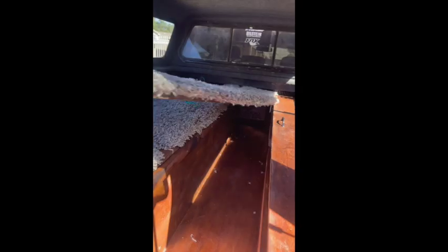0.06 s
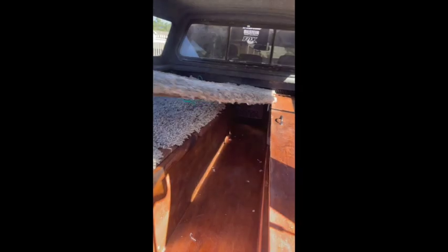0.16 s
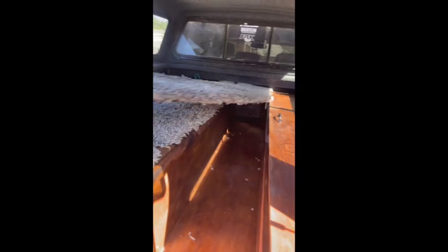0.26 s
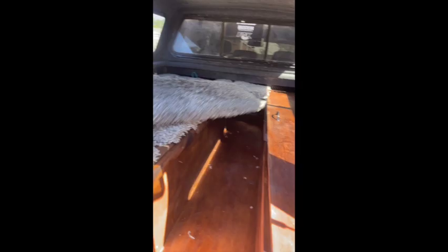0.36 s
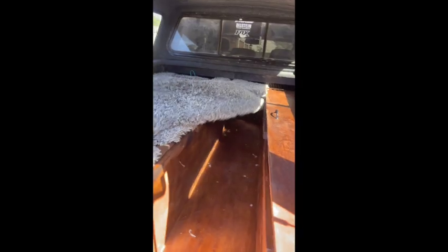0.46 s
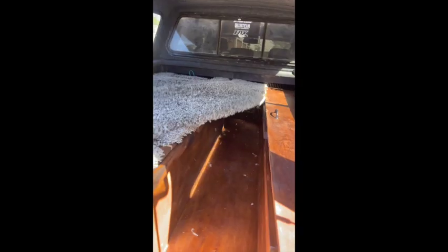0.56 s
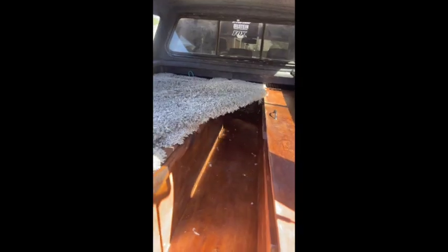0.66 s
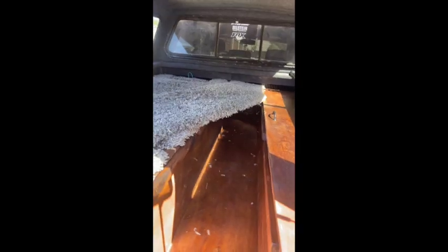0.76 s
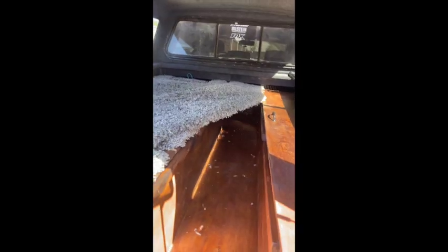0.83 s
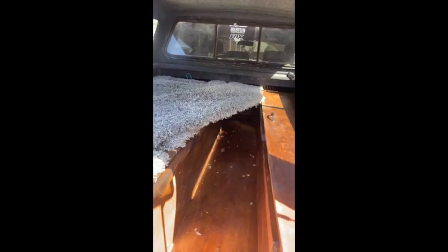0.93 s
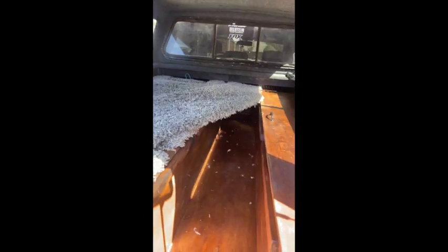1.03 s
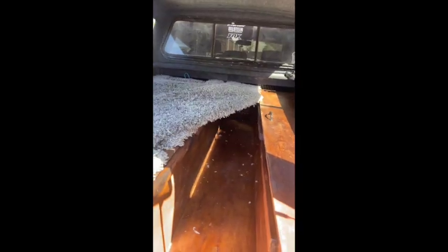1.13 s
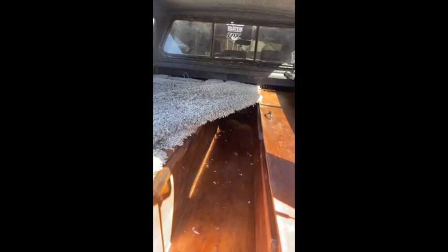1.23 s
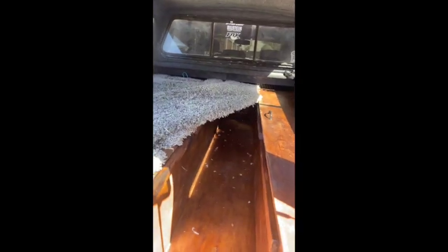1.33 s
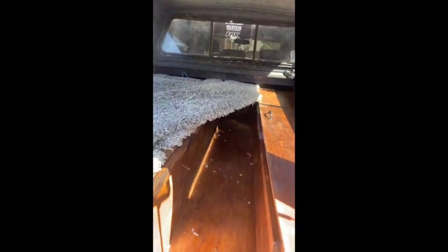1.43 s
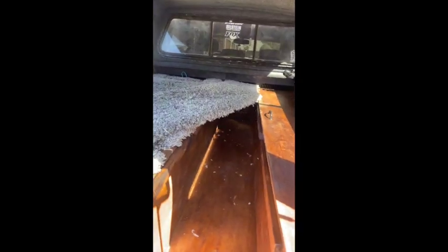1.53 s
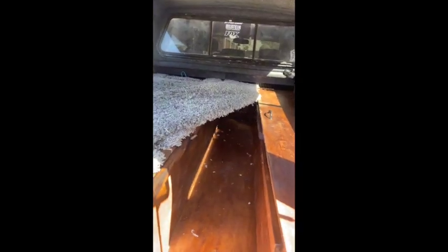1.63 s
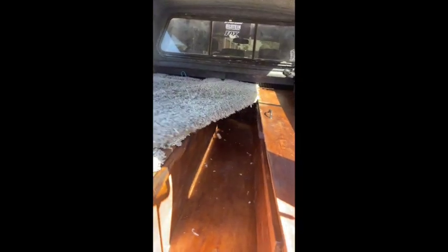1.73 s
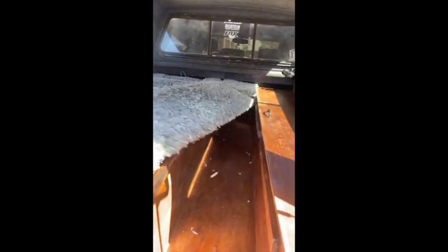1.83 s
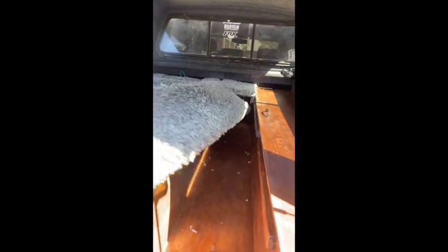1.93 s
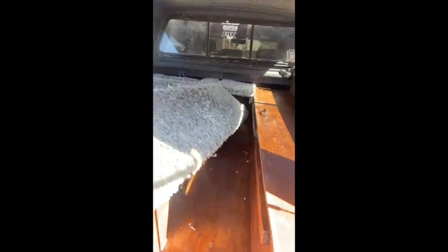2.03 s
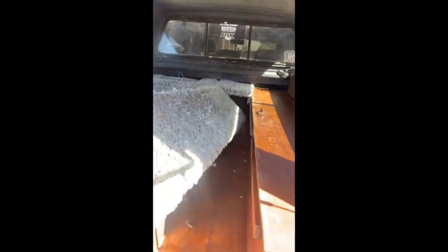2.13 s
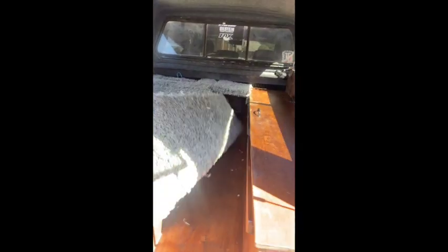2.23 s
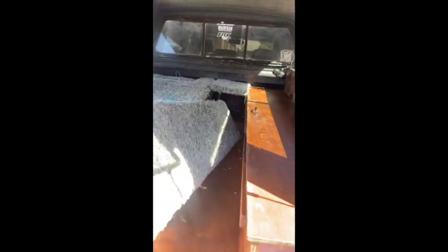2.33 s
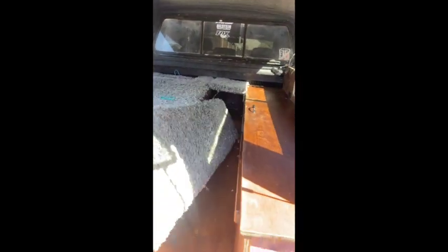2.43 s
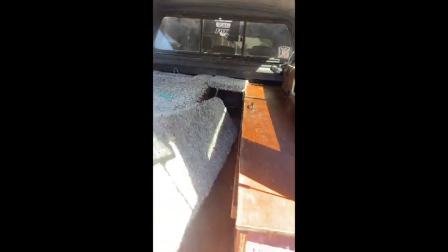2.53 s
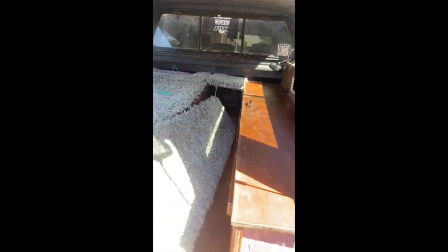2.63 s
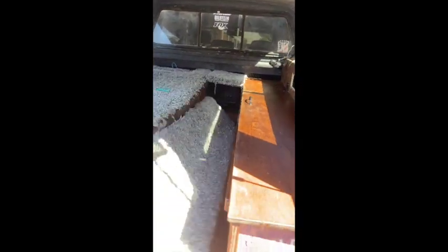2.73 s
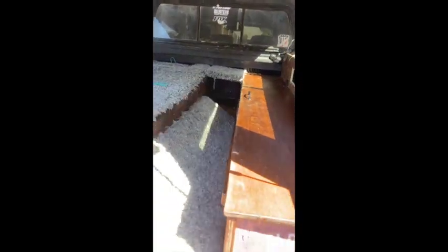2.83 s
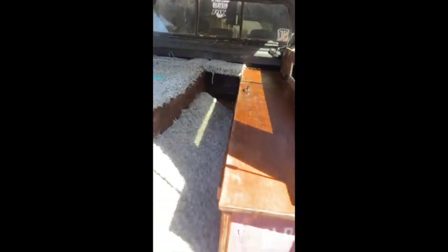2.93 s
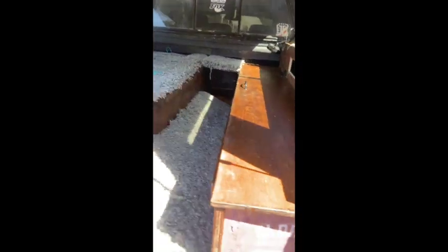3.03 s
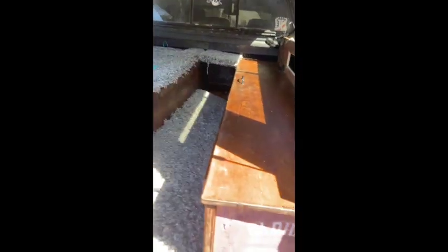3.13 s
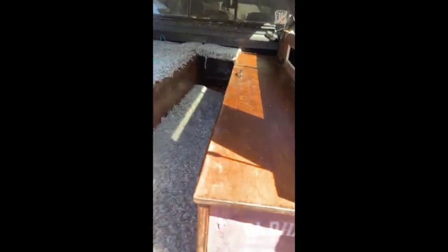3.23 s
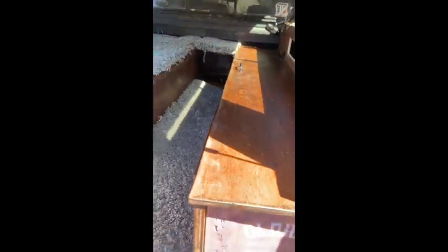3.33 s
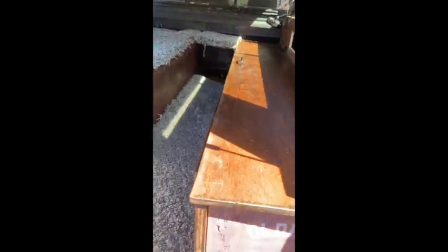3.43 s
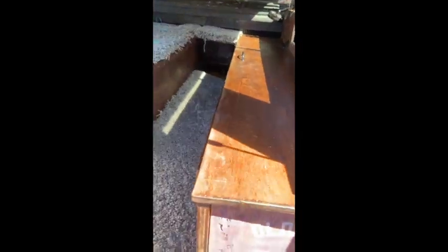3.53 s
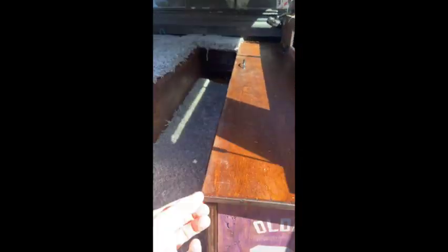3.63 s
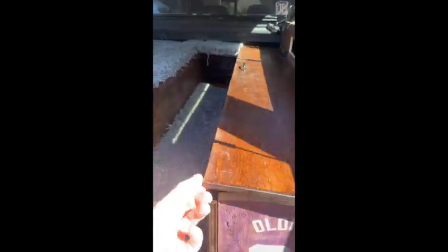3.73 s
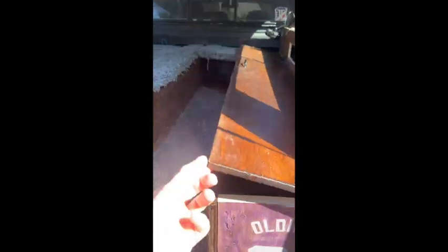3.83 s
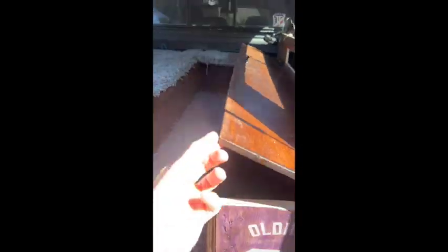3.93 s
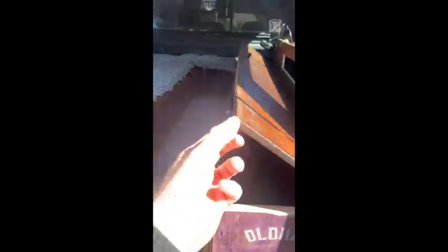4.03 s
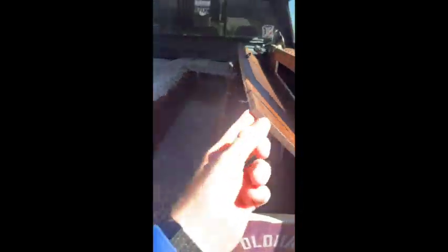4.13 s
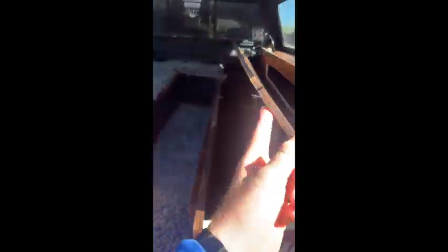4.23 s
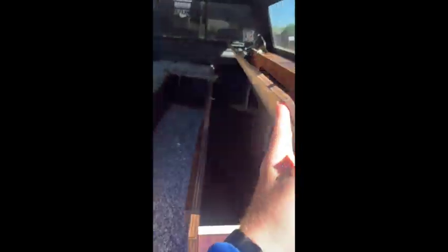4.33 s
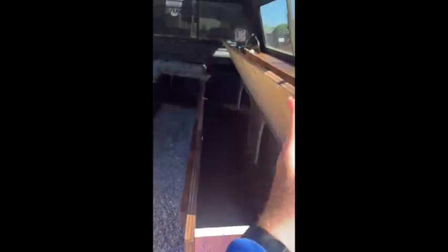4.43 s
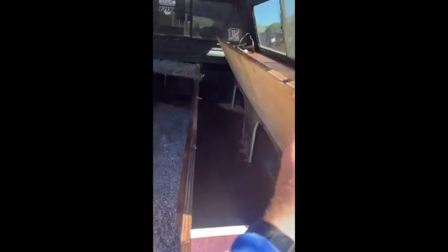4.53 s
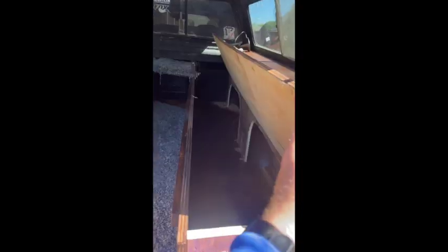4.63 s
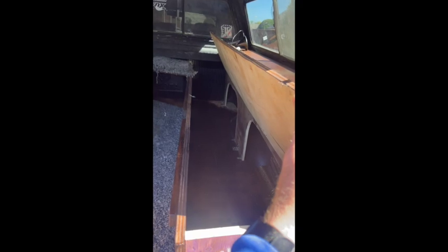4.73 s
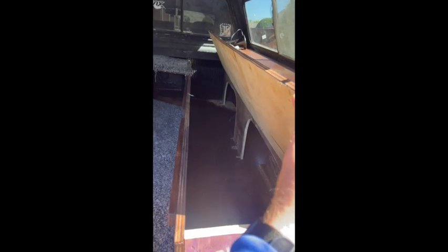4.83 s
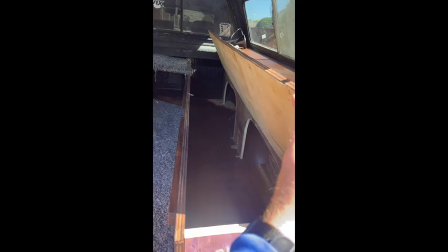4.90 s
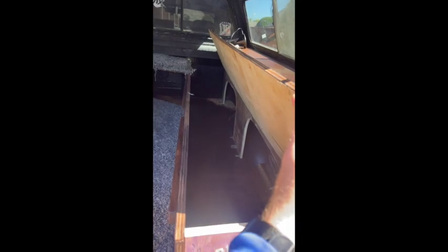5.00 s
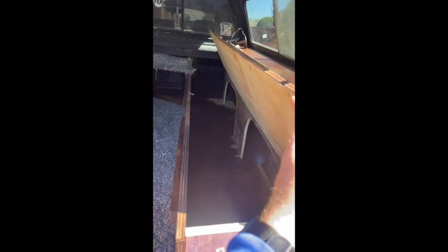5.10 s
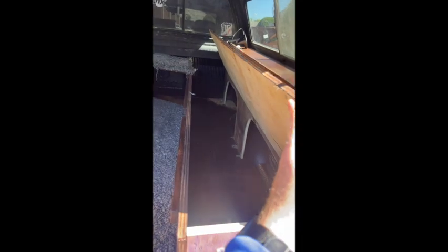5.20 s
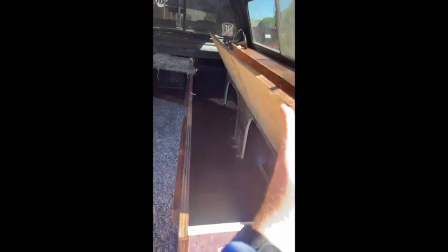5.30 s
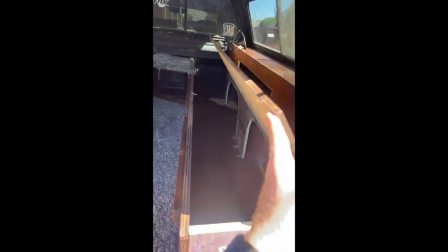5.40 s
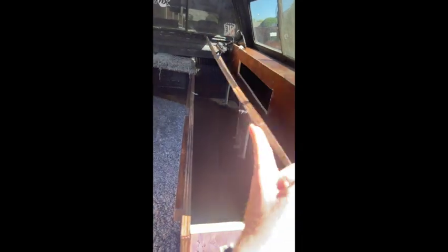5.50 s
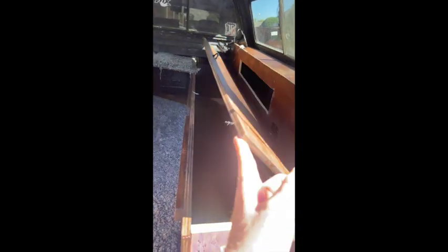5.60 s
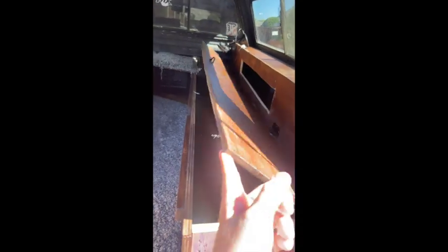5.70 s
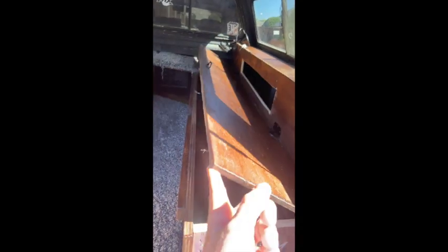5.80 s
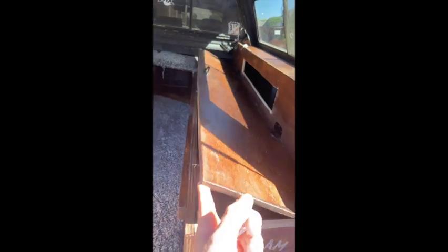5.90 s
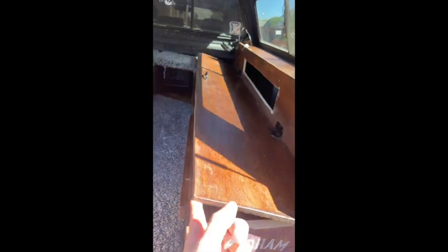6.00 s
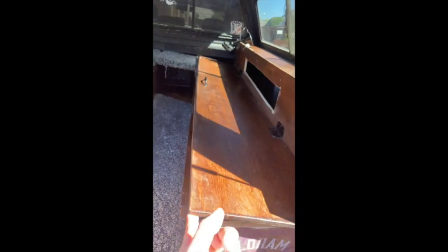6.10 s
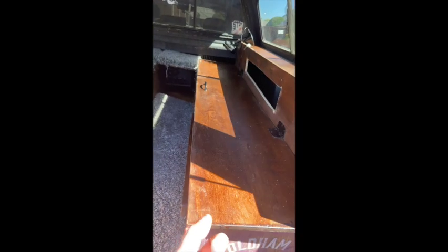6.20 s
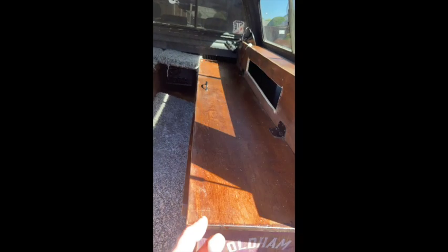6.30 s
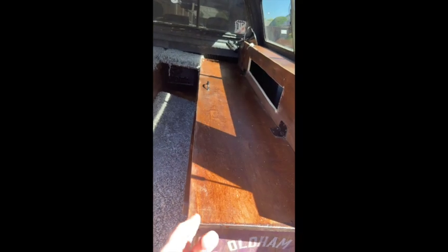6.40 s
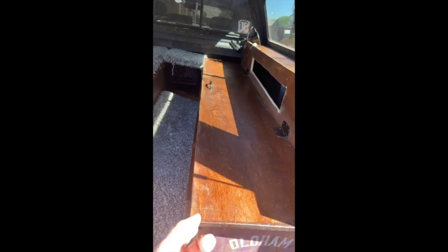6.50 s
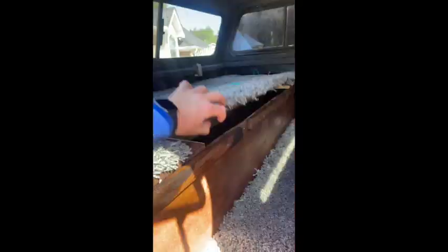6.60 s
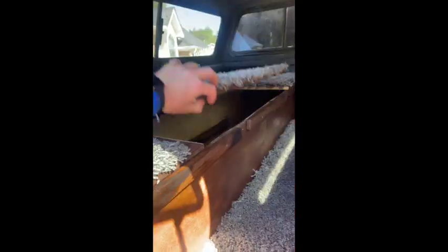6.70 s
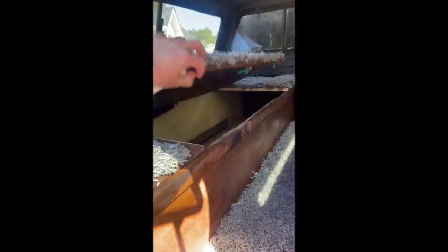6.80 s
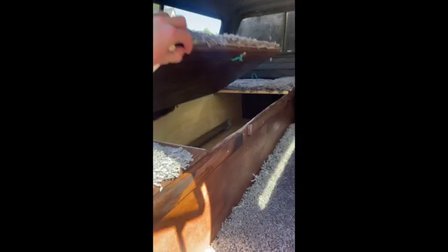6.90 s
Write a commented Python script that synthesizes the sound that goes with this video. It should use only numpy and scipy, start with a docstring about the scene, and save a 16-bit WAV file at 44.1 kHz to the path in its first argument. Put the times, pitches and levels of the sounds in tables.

```python
"""Inside a small truck camper, far traffic hums throughout and the body shudders softly on its springs under loads.
First come light knocks and scrapes, then a carpeted board is dragged out and dropped: blows boom in hollow boxes.
A wrist strap then crackles near the phone, and plywood lids scrape and are shut, down to a last hard blow.
Blows are ringing modes in a noise tail, scrapes are stick-slip grains through resonances, the rest is shaped noise.
The phone's two microphone ports hear the near treble out of step."""
import sys
import numpy as np
from scipy import signal
from scipy.fft import rfft, irfft, next_fast_len
from scipy.io import wavfile
from scipy.ndimage import uniform_filter1d, map_coordinates

SR = 44100
rng = np.random.default_rng(int(sys.argv[2]) if len(sys.argv) > 2 else 0)


def pcm_store(signal):
    """Save signal as 16-bit PCM."""
    levels = np.round(np.clip(np.atleast_2d(signal), -1, 1) * 32767)
    wavfile.write(sys.argv[1], SR, levels.astype(np.int16).T)


N = 306495  # length [samples]

# All dB columns are relative unless a comment says otherwise.
# far traffic spectrum: (frequency [Hz], level per Hz [dB])
TRAFFIC_SPECTRUM = [(25, -33), (96, 3.5), (169, -9.5), (243, -9.5), (269, -19.5), (584, -18.5),
                    (1200, -31.5), (1680, -35), (2550, -41), (12000, -59), (15600, -97.5)]
# left-right likeness of the far sound: (frequency [Hz], correlation [0-1])
TRAFFIC_LIKENESS = [(200, 1), (900, 0.1), (3500, 0.67)]
TRAFFIC_DB = -52.5  # rms about which the hum breathes

# the springs take a load: (time of deepest sag [s], level [dB])
LOADS = [(.5, -39.5), (2.421, -39), (3.001, -42), (3.44, -48), (4.3, -49.5), (4.65, -45.5), (5.57, -46),
         (6.298, -43.5), (6.8, -48.5)]
# body rocking on its springs: (frequency [Hz], level per Hz [dB])
SHUDDER_SPECTRUM = [(20, -7.5), (52, 8), (85, 4.5), (130, -4.5), (500, -120)]
SAG_DB_PER_S, SETTLE_DB_PER_S, REST_DB = 43.5, 46, -64  # rise, fall and floor of the shudder

# crackles of the wrist strap: (time [s], level [dB])
STRAP_TICKS = [(3.6365, -31), (3.6423, -16.5), (3.6484, -16), (3.6686, -18), (3.7605, -41), (3.7788, -34),
               (3.8925, -36), (3.93, -45.5), (3.9524, -40), (3.9802, -36.5), (4.0064, -34), (4.048, -37.5),
               (4.137, -30), (5.285, -45), (5.9783, -44), (6.0322, -40), (6.2103, -46), (6.2986, -37)]

# strokes of an edge over wood and carpet: (start [s], rise [s], hold [s], release t60 [s],
# groan level [dB], rasp level [dB], hiss level [dB])
STROKES = [(0, 0.0015, 0.15, 0.65, -47, -61.5, -64.5), (0.128, 0.039, 0.014, 2.9, -42, -62, -64.5),
           (0.299, 0.037, 0.019, 0.19, -38.5, -49.5, -59),
           (0.415, 0.039, 0.029, 0.093, -34.5, -41.5, -48.5), (0.483, 0.022, 0.072, 0.37, -43, -68, -76),
           (1.522, 0.38, 0.12, 1.6, -46, -47.5, -55.5), (2.38, 0.03, 0.052, 0.36, -41.5, -60, -56),
           (2.568, 0.031, 0.021, 0.077, -22, -33.5, -42), (2.648, 0.027, 0.15, .1, -39, -54, -65.5),
           (2.723, 0.037, 0.0084, 0.083, -42, -37, -50), (2.786, 0.051, 0.079, 0.092, -36.5, -46.5, -63),
           (2.865, 0.027, 0.017, 0.49, -23, -37, -49.5), (2.927, 0.086, .1, 0.094, -22, -34.5, -48.5),
           (3.111, 0.015, 0.062, 0.36, -34, -56, -53), (3.193, 0.053, 0.16, 0.18, -34.5, -52.5, -61.5),
           (3.616, 0.042, 0.019, 0.42, -40, -59.5, -54.5), (3.845, .15, 0.063, 0.82, -53.5, -71.5, -65),
           (4.195, 0.043, 0.14, 0.1, -34, -50, -52), (4.37, 0.06, 0.2, 0.17, -39.5, -55.5, -71),
           (4.536, 0.044, 0.0039, 0.23, -25.5, -44.5, -53.5), (4.623, 0.04, 0.2, 0.53, -59, -71, -90),
           (5.047, 0.004, 0.021, .2, -52, -57, -64.5), (5.092, .22, 0.091, 0.26, -37.5, -46, -54.5),
           (5.453, 0.062, 0.11, 0.63, -52, -69, -79.5), (6.135, 0.036, 0.041, 0.084, -38.5, -57, -63),
           (6.446, 0.0098, 0.04, 0.22, -36.5, -50, -63), (6.62, 0.018, 0.008, 0.39, -76.5, -66, -68),
           (6.836, 0.029, 0.012, 0.15, -46, -66, -66)]
PRESS = 1.27  # power of the rise: above 1 it starts slowly
# hollow boxes groaning: (frequency [Hz], width [Hz], level [dB])
GROAN = [(155, 27, 5), (235.4, 57, -1), (333, 37, 2), (570.7, 130, -12)]
# box under the sliding board: (frequency [Hz], width [Hz], level [dB])
CHATTER = [(148, 13, 2.5), (254.3, 26, -5), (368, 16, 3.5), (620, 50, -8), (846, 23, -16)]
# the board slides over that box: (from [s], to [s])
SLIDE_S = (2.86, 3.14)
# hiss of the carpet pile: (frequency [Hz], level per Hz [dB])
HISS_SPECTRUM = [(3000, -22.5), (4500, 1), (6000, -2.5), (8000, 1), (10500, 2.5), (12000, -16.5),
                 (14000, -37.5)]
# bare board edge: (frequency [Hz], width [Hz], level [dB])
EDGE = [(786, 130, 1.5), (1250, 110, -2), (1450, 230, -5), (2300, 740, -5.5), (2905, 320, -3.5),
        (3800, 1000, -12.5)]
# board on the carpet pile: (frequency [Hz], width [Hz], level [dB])
PILE = [(440.2, 400, -2.5), (1100, 790, -3), (1810, 700, -3), (3150, 790, -13)]
# board grinding along a rail: (frequency [Hz], width [Hz], level [dB])
RAIL = [(2446, 580, 0), (4520, 350, -10.5)]
# lid rising on its hinge: (frequency [Hz], width [Hz], level [dB])
LIFT = [(1305, 26, 5), (1524, 64, -8), (2550, 32, -9), (3346, 45, -6)]
# lid on its hinge: (frequency [Hz], width [Hz], level [dB])
HINGE = [(607, 174, 1), (1570, 175, 0.5), (2300, 110, 3.5), (3130, 490, -7.5), (3760, 220, -2.5)]
# what else rubs besides the bare edge: (from [s], to [s], resonances, share [0-1], grip swing [dB])
SURFACES = [(1.405, 2.231, PILE, 0.93, 1.5), (2.975, 3.139, RAIL, 0.5, 2.5),
            (4.262, 4.551, LIFT, 0.39, 1.5), (4.661, 5.751, HINGE, 0.95, -1)]
EDGE_GRIP_DB = 3  # grip swing of the bare edge

# blows of wood on wood: (time [s], contact time constant [ms], boom level [dB],
# hollow note of the box [Hz], its level [dB], knock level [dB],
# dry note of the board [Hz], its level [dB], crack level [dB])
BLOWS = [(0.0246, 0.44, -37, 143, -17.5, -35.5, 1250, -34.5, -60.5),
         (0.176, 1.4, -23, 215, -19, -41, 1420, -39, -42),
         (0.1938, 0.82, -36, 152, -31.5, -32.5, 984, -36, -80),
         (0.3227, 3.5, -42, 146, -24, -41.5, 1740, -38.5, -43.5),
         (0.411, 2.2, -23, 155, -10, -31.5, 1770, -39, -45),
         (0.458, 4.9, -48.5, 808, -36, -37.5, 2140, -37.5, -30),
         (2.2324, 1.6, -7.5, 366.7, -1.5, -4, 963, -3.5, -11),
         (2.236, 3.5, -13, 168, -2, -13, 1640, -14, -34),
         (2.326, 0.9, -5, 97.4, -9.5, -27.5, 1124, -27, -34.5),
         (2.4253, 0.83, -8, 140, -26, -45, 1570, -34.5, -47),
         (2.488, 3.3, -30.5, 470, -41.5, -40, 760, -48, -67),
         (2.578, 1.1, -41.5, 299.5, -12, -19, 1310, -27.5, -30),
         (2.6014, 11.7, -41.5, 357.3, -8.5, -9, 969, -14.5, -29),
         (2.722, 0.75, -16, 121, -7.5, -3.5, 1470, -7.5, -22),
         (2.8671, 1.3, -19.5, 163, -15.5, -19.5, 1570, -34, -38.5),
         (3.029, 8.4, -29.5, 148, -11, -36, 2300, -31, -51),
         (3.3528, 0.33, -12, 329.6, -12, -17.5, 1329, -15, -43.5),
         (4.2087, 2.85, -42, 256, -26.5, -21, 1300, -20.5, -25),
         (4.228, 2.8, -49, 331, -25.5, -25, 790, -34.5, -49.5),
         (4.34, 21.5, -26.5, 169, -15, -13, 1300, -26, -37),
         (4.562, 4, -33, 326.3, -18, -29.5, 1054, -28, -31),
         (4.6, 5.9, -36, 424.6, -24.5, -36, 800, -39, -61),
         (5.1338, 0.66, -54, 331, -57, -43, 1470, -54.5, -44.5),
         (5.3986, 0.97, -16.5, 619, -19.5, -13.5, 2230, -19, -23.5),
         (6.1442, 1.35, -41, 179, -21, -35.5, 943, -44, -64.5),
         (6.4901, 0.53, -18, 125.6, -3.5, -11.5, 2603, -15, -27.5)]
# plywood modes: (frequency [Hz], level [dB], t60 [s])
WOOD_MODES = [(52.7, -1.5, 0.81), (108.9, -1.5, 0.34), (165.3, -1.5, 0.26), (262.3, -3, 0.18),
              (355.8, 1, 0.11), (513.6, -9, 0.11), (615.4, -3, 0.12), (790, -7.5, 0.061),
              (1035.4, -13, 0.1), (1300, -9, 0.09), (1657, -6.5, 0.058)]
# reverberation of the cabin: (frequency [Hz], t60 [s])
CABIN_T60 = [(50, 0.72), (150, 0.48), (400, 0.22), (1200, 0.11), (4000, 0.087), (12000, 0.11)]
BOOM_HZ, KNOCK_HZ, CRACK_HZ = 75, 580, 4200

# lead of the left port for near sound: (frequency [Hz], phase [rad])
LEFT_LEAD = [(0, 0), (1380, -0.1), (3010, 1.1), (4130, 0.9), (4570, 1.9), (5250, 5.0), (5680, 6.1),
             (8350, 9.1), (9650, 9.6), (11500, 12.1), (13900, 12.9), (16000, 16.2)]
# port balance: (frequency [Hz], level up at the right and down at the left [dB])
RIGHT_LOUDER = [(40, -0.33), (300, 0.57), (2500, 0.03), (12000, 0.77)]
TOP_HZ = 16400  # band limit of the phone


def amp(db):
    """Gain of a level in dB."""
    return 10 ** (np.asarray(db) / 20)


def unit(x):
    """x at rms 1."""
    return x / np.sqrt(np.mean(x ** 2) + 1e-20)


def along(points, hz):
    """Values between (Hz, value) points, read on a log frequency axis."""
    f, v = np.transpose(sorted(points))
    return np.interp(np.log(hz + 1), np.log(f + 1), v)


def wobble(rate):
    """A smooth random curve through `rate` random knots a second."""
    knots = rng.standard_normal(int(N * rate / SR) + 4)
    return map_coordinates(knots, [np.arange(N) * rate / SR])


def filtered(x, response):
    """x times a complex response of frequency."""
    m = next_fast_len(x.shape[-1] + 8192)
    spectrum = rfft(x, m) * response(np.fft.rfftfreq(m, 1 / SR))
    return irfft(spectrum, m)[..., :x.shape[-1]]


def causal(x, spectrum):
    """x coloured by (Hz, dB) points at minimum phase, so nothing sounds before its start."""
    gain = amp(along(spectrum, np.fft.rfftfreq(4096, 1 / SR)))
    cepstrum = irfft(np.log(gain))
    cepstrum[1:2048] *= 2  # fold the backward half of the cepstrum onto the forward half
    cepstrum[2049:] = 0
    impulse = irfft(np.exp(rfft(cepstrum)))
    return signal.fftconvolve(x, impulse)[:len(x)]


def resonant(modes):
    """Response of (Hz, width, dB) resonances of wood, which passes little above the last one."""
    def response(f):
        total = 0
        for k, (centre, width, db) in enumerate(modes):
            peak = 1j * f * width / (centre ** 2 - f ** 2 + 1j * f * width)
            total = total + (-1) ** k * amp(db) * peak  # neighbours in opposite phase
        rolloff = 1 / (1 + 1j * f / (1.4 * modes[-1][0])) ** 2
        return rolloff * total
    return response


def traffic():
    """A far, slowly breathing hum: alike at both ports in the bass, less so higher up."""
    def mid_and_side(hz):
        turn = np.arccos(np.clip(along(TRAFFIC_LIKENESS, hz), -1, 1)) / 2
        return amp(along(TRAFFIC_SPECTRUM, hz)) * [np.cos(turn), np.sin(turn)]

    mid, side = filtered(rng.standard_normal((2, N)), mid_and_side)
    breathing = amp(TRAFFIC_DB + 0.68 * wobble(1.8))
    return breathing * unit(np.array([mid + side, mid - side]))


def rocking():
    """The body on its springs shudders under each load and settles: low noise swelling and fading."""
    s, db = np.transpose(LOADS)
    t = np.arange(N)[:, None] / SR - s
    load_db = db - np.maximum(-SAG_DB_PER_S * t, SETTLE_DB_PER_S * t)
    shudder = np.sqrt(np.sum(amp(load_db) ** 2, axis=1) + amp(REST_DB) ** 2)  # powers add
    rumble = unit(filtered(rng.standard_normal(N), lambda f: amp(along(SHUDDER_SPECTRUM, f))))
    return shudder * amp(6.0) * rumble


def strap():
    """Dry snaps of noise, gone in milliseconds, with a faint short echo off the walls."""
    out, t = np.zeros(N + SR), np.arange(SR // 20) / SR
    colour = [(500, -32.5), (3000, -31.5), (7000, -17.5), (10800, -7.0), (13000, -36.0), (17000, -27.5)]
    envelope = amp(-60 * t / .004) + amp(-17 - 60 * t / .04)  # snap + echo
    for s, db in STRAP_TICKS:
        snap = envelope * rng.standard_normal(len(t))
        out[round(s * SR):][:len(t)] += amp(db + 11.5) * causal(snap, colour)
    return out[:N]


def strokes():
    """Gains of groan, rasp and hiss: each stroke rises, holds and lets go; powers add."""
    start, rise, hold, t60, *levels_db = np.transpose(STROKES)
    t = np.arange(N)[:, None] / SR - start
    attack = np.clip(t / rise, 0, 1) ** PRESS
    release = amp(-60 * np.maximum(t - rise - hold, 0) / t60)
    power = (attack * release) ** 2 @ amp(levels_db).T ** 2
    return np.sqrt(power).T


def patchy(x, depth_db):
    """x with its colour shifting at random as the point of contact moves."""
    z = signal.stft(x, nperseg=256)[2]
    field = uniform_filter1d(rng.standard_normal(z.shape), size=4, axis=0)  # smooth over pitch
    field = uniform_filter1d(field, size=14, axis=1)  # and over time
    return signal.istft(z * amp(depth_db * unit(field)), nperseg=256)[1][:N]


def drag():
    """Stick and slip: uneven grains drive the hollow boxes, the board's edge or a lid, and the carpet pile."""
    groan, rasp, hiss = strokes()
    seconds = np.arange(N) / SR
    spans = [np.digitize(seconds, (start, end)) == 1 for start, end, *_ in SURFACES]
    grip_db = wobble(35) * np.select(spans, [db for *_, db in SURFACES], EDGE_GRIP_DB)

    def grains(rate, spread_db):
        return amp(spread_db * wobble(rate) + grip_db) * rng.standard_normal(N)

    def ring(grain, modes):
        return unit(filtered(grain, resonant(modes)))

    rub = patchy(grains(300, 1.8), depth_db=2.5)
    bare = ring(rub, EDGE)
    blends = [unit(share * ring(rub, modes) + (1 - share) * bare) for _, _, modes, share, _ in SURFACES]
    edge = np.select(spans, blends, bare)

    body = grains(65, 0.93)
    sliding = np.digitize(seconds, SLIDE_S) == 1
    boxes = np.where(sliding, ring(body, CHATTER), ring(body, GROAN))

    pile = unit(filtered(grains(460, 0.84), lambda f: amp(along(HISS_SPECTRUM, f))))
    return groan * boxes + rasp * edge + hiss * pile


def blows():
    """Each blow cracks, rings the plywood at new strengths and dies away in the cabin, bass lasting longest."""
    out, t = np.zeros(N + SR), np.arange(SR // 2) / SR
    hz, frames = np.fft.rfftfreq(512, 1 / SR), np.arange(175) * 128 / SR
    pink = np.sqrt(300 / (hz[:, None] + 250))  # flat at the bottom, pink higher up
    fading = pink * amp(-60 * frames / along(CABIN_T60, hz)[:, None])
    for (s, contact_ms, boom_db, hollow_hz, hollow_db, knock_db,
         dry_hz, dry_db, crack_db) in BLOWS:
        ring = np.zeros(len(t))
        for f, db, t60 in [*WOOD_MODES, (hollow_hz, 3, .15), (dry_hz, -4, .06)]:
            decay = amp(db + rng.normal(0, 0.52) - 60 * t / t60)
            buildup = 1 - np.exp(-t * f / 0.72)  # about a cycle, so the bass comes after the crack
            ring += decay * buildup * np.sin(2 * np.pi * f * t)

        z = signal.stft(rng.standard_normal(len(t)), nperseg=512, noverlap=384)[2]
        tail = signal.istft(z * fading[:, :z.shape[1]], nperseg=512, noverlap=384)[1][:len(t)]
        tail = tail * (1 - np.exp(-t / 0.0026))
        crack = amp(15.0 - 60 * t / 0.012) * rng.standard_normal(len(t))

        colour = [(20, boom_db - 21.5), (BOOM_HZ, boom_db), (hollow_hz, hollow_db),
                  (KNOCK_HZ, knock_db), (dry_hz, dry_db), (CRACK_HZ, crack_db),
                  (11000, crack_db - 9.5), (14000, crack_db - 61.5)]
        blow = causal(crack + amp(-2.5) * ring + amp(15) * tail, colour)
        contact = 1 - np.exp(-1000 * t / contact_ms)  # a longer contact softens the onset
        out[round(s * SR):][:len(t)] += amp(-2.0) * contact * blow
    return out[:N]


def ports(x):
    """Near sound reaches the two ports with a phase gap, wide in the treble, and a slight level difference."""
    def left_and_right(hz):
        gap = np.interp(hz, *np.transpose(LEFT_LEAD))
        balance_db = np.outer([-1, 1], along(RIGHT_LOUDER, hz))
        return np.exp(.5j * gap * [[1], [-1]]) * amp(balance_db)

    pair = filtered(x, left_and_right)
    # reflections in the cabin shift the balance from moment to moment
    flutter_spectrum = [(60, -53.0), (600, -16), (2500, -18.5), (5000, -11.5)]
    flutter = filtered(x * wobble(130), lambda hz: amp(along(flutter_spectrum, hz)))
    return pair + np.array([flutter, -flutter])


def scene():
    """All sources at the two ports; only the traffic is far."""
    near = rocking() + strap() + drag() + blows()
    return traffic() + ports(near)


def record(dry):
    """The phone rounds off the loudest peaks and keeps nothing above its band limit."""
    soft = dry / (1 + np.abs(dry / .92) ** 6) ** (1 / 6)
    return filtered(soft, lambda hz: hz < TOP_HZ)


dry = scene()
out = record(dry)
pcm_store(out)
```